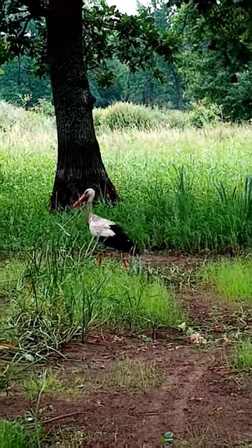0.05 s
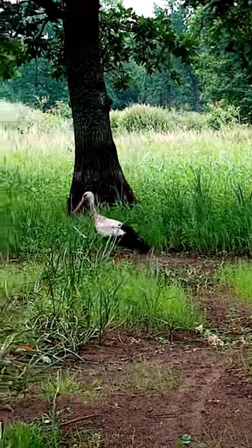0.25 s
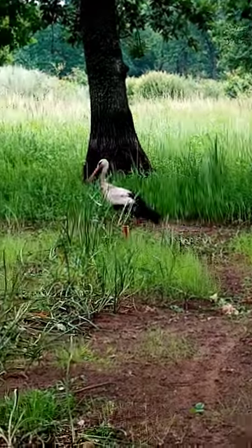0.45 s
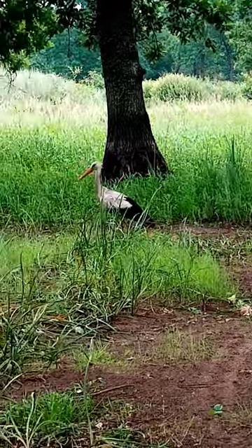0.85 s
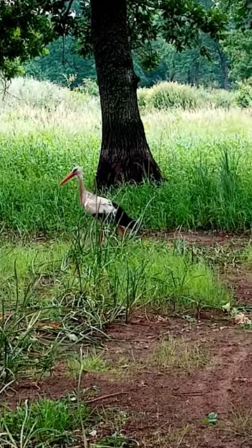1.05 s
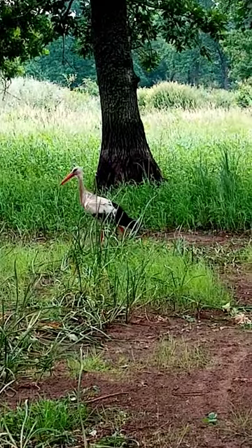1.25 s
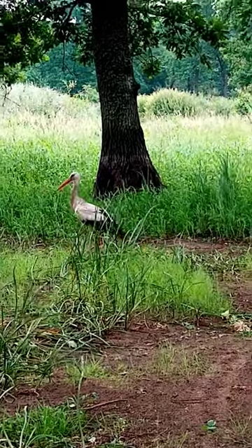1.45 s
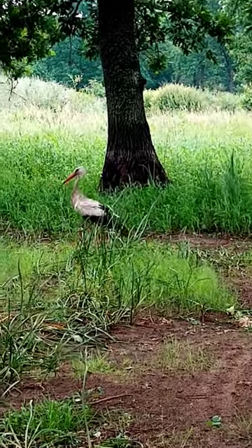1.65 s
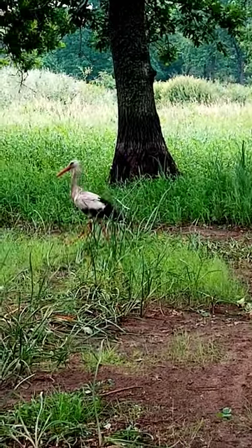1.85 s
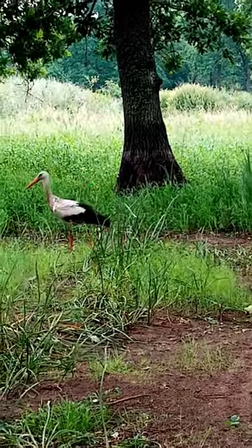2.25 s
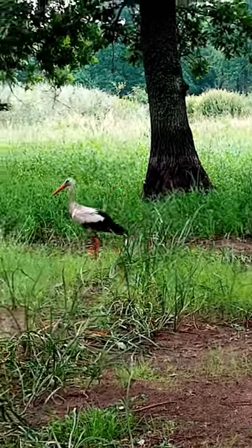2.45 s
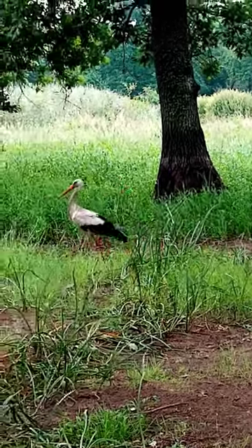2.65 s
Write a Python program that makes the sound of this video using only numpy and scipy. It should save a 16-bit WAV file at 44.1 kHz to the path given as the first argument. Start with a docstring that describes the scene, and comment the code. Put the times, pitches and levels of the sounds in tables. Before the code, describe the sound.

Wind buffets the microphone with low rumble and thumps, mostly on the left, at a meadow edge. A small bird gives a thin falling whistle, a twig snaps, something creaks briefly, and another whistle begins over faintly hissing leaves.

```python
"""Wind and a whistle at a meadow edge

Wind buffets the left microphone port with rumble, flutter and thumping eddies. A small bird whistles
one thin falling note, echoed by the trees, and starts another. Close by come a few dry ticks, a twig
snapping and a short, slowing stick-slip creak, over a faint hiss of leaves and far twittering."""
import sys
import numpy as np
from scipy import signal
from scipy.fft import rfft, irfft, next_fast_len
from scipy.io import wavfile
from scipy.ndimage import uniform_filter1d, map_coordinates

SR = 44100
rng = np.random.default_rng(int(sys.argv[2]) if len(sys.argv) > 2 else 0)


def inscribe(sig):
    """Save sig as 16-bit PCM at rate SR to the path in sys.argv[1].

    A 1-D sig is mono; a 2-D sig holds one channel per row.
    Samples are clipped to [-1, 1] before scaling.
    """
    pcm = np.round(np.clip(np.atleast_2d(sig).T, -1, 1) * 32767)
    wavfile.write(sys.argv[1], SR, pcm.astype(np.int16))


N = 123479
TIME = np.arange(N) / SR


def amp(db):
    """Decibels to gain."""
    return 10 ** (np.asarray(db) / 20)


def unit(x):
    """Scale to rms 1."""
    return x / np.sqrt(np.mean(x ** 2) + 1e-20)


def pan(db):
    """Stereo gains that put the left side db above the right."""
    return amp(np.array([[db], [-db]]) / 2)


def curves(rows, start=0):
    """Breakpoints to one curve for each column after the time."""
    times, *columns = np.transpose(rows)
    return [np.interp(TIME - start, times, column) for column in columns]


def during(rows, start=0):
    """A gate, open from the first breakpoint to the last."""
    return (TIME - start >= rows[0][0]) & (TIME - start <= rows[-1][0])


def wobble(rate):
    """A smooth random curve, rate knots a second."""
    return map_coordinates(rng.standard_normal(1024), [TIME * rate], mode="wrap")


def noise(colour):
    """Two unrelated noises of rms 1, shaped by (Hz, dB) points."""
    size = next_fast_len(N + 8192)
    hz, db = np.transpose(colour)
    gain = amp(np.interp(np.log(np.fft.rfftfreq(size, 1 / SR) + 1), np.log(hz + 1), db))
    white = rng.standard_normal((2, size))
    return unit(irfft(rfft(white) * gain, size)[:, :N])


def evened(x, window_s=0.035):
    """Noise with its chance swells flattened."""
    power = uniform_filter1d(x ** 2, int(window_s * SR), axis=-1)
    return x / np.sqrt(np.abs(power) + 0.022)


def kick(centre_s, hz, cycles):
    """One brief swing of pressure: a sine under a bell curve."""
    turns = np.clip((TIME - centre_s) * hz, -20, 20)
    return np.sin(2 * np.pi * turns) * np.exp(-(turns / cycles) ** 2 / 2)


def echo(x, t60, rise_s=.0023):
    """A diffuse tail of scattered echoes, different on each side."""
    t = np.arange(SR) / SR
    tail = rng.standard_normal((2, SR)) * amp(-60 * t / t60) * (1 - np.exp(-t / rise_s))
    return signal.fftconvolve(np.atleast_2d(x), tail / np.linalg.norm(tail[0]), axes=1)[:, :N]


def distant_air():
    """A faint, low bed of far-off air."""
    return amp(-68) * noise([(30, -8.5), (100, -4), (300, -27), (700, -15), (1200, -17.5), (3000, -62)])


# The colour of the leaf hiss. Each row: frequency in Hz, relative level in dB.
LEAF_COLOUR = [(500, -43.5), (900, -16.5), (1400, -3.5), (2000, -4), (2400, -2), (3100, -5.5), (4000, -1),
               (5200, -2), (6500, 2), (7450, 0), (8400, -15), (9200, -31), (12500, -29), (15200, -33.5)]
# Level of the background hiss, which ducks during the strongest gusts and then recovers. Each row: time in
# seconds, level in dB.
LEAF_LEVEL = [(0, -56), (.5, -54), (.82, -58), (1.1, -57), (1.45, -57.5), (1.8, -56.5), (2.25, -54),
              (2.5, -54.5), (2.8, -56)]


def leaves():
    """A wide hiss of leaves that ducks during the strongest gusts and then recovers."""
    mid, side = noise(LEAF_COLOUR)
    hiss = unit(np.array([mid + side, mid - side]))
    level_db, = curves(LEAF_LEVEL)
    return hiss * pan(2) * amp(level_db + 1.68 * wobble(25.37))


# A far songbird's phrase. Each row: time in seconds, pitch in Hz, level in dB.
TWITTER_PHRASE = [(0, 2600, -75), (.12, 2600, -69), (.29, 2950, -66), (.5, 2700, -70), (.6, 3650, -65),
                  (.68, 3700, -74)]


def far_twitter():
    """Quick wandering syllables from the wood, heard only as echo."""
    hz, db = curves(TWITTER_PHRASE)
    hz = hz * np.exp(.05 * wobble(70))
    syllables = wobble(35) ** 2
    song = unit(syllables * np.sin(2 * np.pi * np.cumsum(hz) / SR))
    return echo(during(TWITTER_PHRASE) * amp(db) * song, t60=.3)


# Small taps. Each row: time in seconds, level in dB, pitch in Hz, left over right in dB.
TICK_HITS = [(0.4213, -32, 1214, -22.5), (0.4236, -34, 3800, -8.5), (0.449, -38, 5000, -10),
             (0.4583, -33, 4900, -13), (0.4622, -30, 5400, -16.5)]


def ticks():
    """Tiny dry contacts near the right port."""
    return sum(amp(db) * pan(side) * kick(at, hz, cycles=.32) for at, db, hz, side in TICK_HITS)


# The twig breaking. Each row: start in seconds, level in dB, left over right in dB.
TWIG_SNAPS = [(1.5769, -35, 10), (1.5862, -43.5, 0)]
# Its woody ring. Each row: frequency in Hz, relative level in dB, seconds to fade by 60 dB.
TWIG_MODES = [(1653, -7.5, 0.029), (1724, -5.5, 0.05), (1840, -9.5, 0.043), (3770, -5.5, 0.02),
              (5750, -11, .018), (4660, 1, 0.0058), (6350, 10, 0.0075), (6900, -5.5, 0.02)]
# The colour of its crack. Each row: frequency in Hz, relative level in dB.
CRACK_COLOUR = [(500, -3), (1500, -6), (4000, 3.5), (6800, -3), (8000, -19.5), (10000, -26), (15000, -61)]


def twig(right_lag_s=0.00102, attack_s=0.000067, crack_t60=0.026):
    """Each snap is a crack with a short woody ring, reaching the left port first."""
    snaps = np.zeros((2, N))
    for start, db, side in TWIG_SNAPS:
        t = np.maximum(TIME - start - np.array([[0], [right_lag_s]]), 0)
        ring = sum(amp(level - 60 * t / t60) * np.sin(2 * np.pi * hz * t)
                   for hz, level, t60 in TWIG_MODES)
        crack = noise(CRACK_COLOUR) * amp(-60 * t / crack_t60)
        attack = 1 - np.exp(-t / attack_s)
        snaps += amp(db) * pan(side) * attack * (0.9 * ring + crack)
    snaps = signal.sosfilt(signal.butter(6, 8000, fs=SR, output="sos"), snaps)
    return snaps + amp(-8) * echo(snaps, t60=0.26)


# The creak's gesture. Each row: time in seconds, slips a second, slip strength in dB.
CREAK_GESTURE = [(2.255, 197, -64), (2.285, 202, -40.5), (2.31, 180, -43.5), (2.328, 140, -36),
                 (2.355, 101, -44.5), (2.38, 110, -57), (2.41, 80, -45), (2.46, 64, -57), (2.51, 43, -45),
                 (2.525, 15.3, -72)]
# Its resonances. Each row: frequency in Hz, relative level in dB, swell in seconds,
# exponent on slip strength.
CREAK_RESONANCES = [(1360, -1, 0.0015, 1.1), (2790, -14.5, 0.0013, 2.5)]
# The rub that leads into the creak. Each row: time in seconds, level in dB.
SCUFF_SWELL = [(2.148, -82.5), (2.165, -48), (2.19, -57), (2.205, -70.5), (2.26, -58.5), (2.33, -77)]
# The colour of that rub. Each row: frequency in Hz, relative level in dB.
SCUFF_TONE = [(700, -45), (1050, -11), (1380, -1.5), (1700, -3), (2100, -15), (2600, -7), (3300, -14.5),
              (6000, -47)]


def creak():
    """A scuff turns into slowing stick-slip pulses that ring two resonances, hard slips brighter."""
    rate, db = curves(CREAK_GESTURE)
    slip_count = np.floor(np.cumsum(rate * (1 + 0.05 * wobble(90))) / SR)
    strength = during(CREAK_GESTURE) * amp(db - db.max() + wobble(88))
    slips = np.diff(slip_count, prepend=0) * strength
    t = np.arange(SR // 20) / SR
    body = np.zeros(N)
    for hz, level, swell_s, exponent in CREAK_RESONANCES:
        envelope = (t / swell_s * np.exp(1 - t / swell_s)) ** 3
        ring = amp(level) * envelope * np.sin(2 * np.pi * hz * t)
        body += signal.fftconvolve(slips ** exponent, ring)[:N]
    scuff_db, = curves(SCUFF_SWELL)
    scuff = during(SCUFF_SWELL) * amp(scuff_db) * noise(SCUFF_TONE)[0]
    direct = amp(db.max()) * body + scuff
    return direct * pan(9) + amp(-4) * echo(direct, t60=0.1)


def whistle(rows, start=0):
    """A pure, slightly wavering tone along a pitch and level curve."""
    hz, db = curves(rows, start)
    envelope = during(rows, start) * amp(db + wobble(120))
    wavering_hz = hz * (1 + .008 * wobble(150))
    return envelope * np.sin(2 * np.pi * np.cumsum(wavering_hz) / SR)


# The falling note. Each row: seconds into the note, pitch in Hz, relative level in dB.
FALLING_NOTE = [(0, 7950, -16), (.008, 7650, -3), (.025, 7170, -1), (.04, 6880, -1), (.06, 6570, 1),
                (.085, 6300, 3), (.115, 6050, 3), (.145, 5640, 2.5), (.175, 5100, -1), (.205, 4700, -4.5),
                (.226, 4480, -12), (.236, 4400, -30)]
# The bird's cues for that note. Each row: start in seconds, level in dB.
NOTE_CUES = [(0.964, -48), (2.747, -50)]
# A second bird's chip. Each row: time in seconds, pitch in Hz, level in dB.
CHIP_NOTE = [(2.756, 3700, -59), (2.766, 4280, -58), (2.776, 4620, -52), (2.782, 4670, -69),
             (2.799, 4250, -60)]


def birds(upper_spacing_hz=3900):
    """Falling whistles and a small chip, smeared by near and far echoes, with faint tones above."""
    song = sum(amp(db) * whistle(FALLING_NOTE, start) for start, db in NOTE_CUES) + whistle(CHIP_NOTE)
    ground_and_trunk = amp(3.5) * echo(song, t60=.15, rise_s=.015)
    wood = amp(4) * echo(song, t60=.6, rise_s=.015)
    heard = song * pan(9) + pan(2.5) * (ground_and_trunk + wood)
    # Two frequency-shifted copies ride above the song, evenly spaced.
    shifts = sum(np.exp(2j * np.pi * k * upper_spacing_hz * TIME) / k ** 2 for k in (1, 2))
    upper_tones = (signal.hilbert(heard) * shifts).real
    return heard + amp(-36) * upper_tones


# Gusts at the exposed left port. Each row: time in seconds, level in dB.
EXPOSED_GUSTS = [(0, -34.5), (.1, -38), (.14, -24.5), (.2, -44.5), (.23, -25), (.37, -26.5), (.395, -42),
                 (.44, -23), (.52, -26), (.63, -35.5), (.67, -22.5), (.73, -27.5), (.8, -14.5), (.83, -17),
                 (.87, -26.5), (.915, -16.5), (.94, -26.5), (1.04, -18.5), (1.09, -28.5), (1.14, -19.5),
                 (1.22, -34.5), (1.28, -23.5), (1.33, -33), (1.45, -21), (1.53, -32.5), (1.64, -24.5),
                 (1.69, -32), (1.75, -21.5), (1.84, -28), (1.93, -32), (2.04, -26.5), (2.09, -37),
                 (2.21, -21.5), (2.26, -32), (2.36, -22.5), (2.42, -25), (2.45, -36.5), (2.48, -23.5),
                 (2.55, -25.5), (2.6, -43.5), (2.64, -70), (2.67, -33), (2.73, -35), (2.8, -50)]
# Gusts at the sheltered right port. Each row: time in seconds, level in dB.
SHELTERED_GUSTS = [(0, -46.5), (.12, -45), (.18, -26.5), (.33, -63.5), (.43, -42.5), (.58, -87), (.73, -42),
                   (.85, -46.5), (1.48, -45.5), (1.7, -78), (2.28, -80), (2.44, -59.5), (2.62, -80)]
# The colour of the deep rumble. Each row: frequency in Hz, relative level in dB.
RUMBLE_COLOUR = [(20, -34), (35, -19), (55, -5), (90, 0), (140, 0), (200, -10), (300, -32), (420, -52),
                 (2000, -120)]
# The colour of the brighter flutter. Each row: frequency in Hz, relative level in dB.
FLUTTER_COLOUR = [(120, -15), (200, 7), (320, 3), (480, -16.5), (650, -29), (900, -36.5), (2000, -100)]


def wind(strong_gust_db=-23, flutter_growth=2.3):
    """Rumble follows the gusts at each port; flutter grows faster and saturates in strong gusts."""
    gust_db = np.array(curves(EXPOSED_GUSTS) + curves(SHELTERED_GUSTS))
    rumble = evened(noise(RUMBLE_COLOUR)) * amp(gust_db + wobble(32.88))
    flutter_db = -32 + flutter_growth * np.minimum(gust_db - strong_gust_db, 0)
    flutter = evened(noise(FLUTTER_COLOUR)) * amp(flutter_db + 3.5 * wobble(70))
    return rumble + flutter


# Eddy hits. Each row: time in seconds, thump level in dB, thump pitch in Hz, front level in dB.
EDDY_HITS = [(.239, -7, 240, -24.5), (0.409, -14.5, 143, -40.5), (.475, -12, 173, -51),
             (0.676, -13.5, 207, -19.5), (0.697, -19.5, 232, -34.5), (0.761, -9, 196, -24),
             (.776, -12.5, 271, -24.5), (.784, -23, 202, -16), (0.799, -9.5, 200, -21),
             (0.823, -11, 197, -17), (0.846, -11.5, 253, -21.5), (0.9042, -6.5, 351, -19),
             (0.996, -34.5, 199, -19.5), (1.029, -15.5, 239, -29), (1.043, -18.5, 294, -20),
             (1.071, -16, 197, -23.5), (1.139, -20, 155, -18.5), (1.172, -14.5, 194, -28.5),
             (1.251, -9.5, 178, -21), (1.338, -13, 134, -43), (1.387, -18.5, 182, -26.5),
             (1.48, -12, 150.5, -34), (1.573, -19, 275, -45), (1.635, -10.5, 131, -57),
             (1.663, -15, 209, -35.5), (1.737, -23, 280, -25), (1.746, -12, 186, -28),
             (1.788, -18, 131, -54), (1.821, -15, 195, -33), (1.861, -21.5, 210, -44),
             (1.899, -19, 123.5, -42), (2.029, -17.5, 226.5, -27), (2.054, -19.5, 212, -35),
             (2.109, -17.5, 142, -33), (2.217, -10.5, 192, -29), (2.33, -17, 208, -30.5),
             (2.364, -11, 135, -45), (2.42, -20.5, 190, -30), (2.471, -16, 228, -33)]


def eddies():
    """Single eddies strike the exposed port, each a low thump with a steep, higher-pitched front."""
    thumps = np.zeros(N)
    for at, db, hz, front_db in EDDY_HITS:
        front_hz = 414 * (hz / 220) ** 0.78
        thumps += amp(db) * kick(at, hz, cycles=.5) + amp(front_db) * kick(at, front_hz, cycles=.6)
    return thumps * amp([[0], [-36]])


def scene():
    """The stereo mix at the two ports."""
    return (wind() + eddies() + leaves() + distant_air()
            + birds() + far_twitter() + ticks() + twig() + creak())


def record(dry, low_cut_hz=45, top_hz=15500):
    """The recorder cuts the deepest rumble, dulls the top octave and keeps nothing above top_hz."""
    size = next_fast_len(N + 8192)
    hz = np.fft.rfftfreq(size, 1 / SR)
    low_cut = hz ** 2 / np.hypot(hz ** 2, low_cut_hz ** 2)
    high_shelf = amp(np.interp(hz, [7800, 10000], [0, -3]))
    return irfft(rfft(dry, size) * low_cut * high_shelf * (hz < top_hz), size)[:, :N]


dry = scene()
out = record(dry)
inscribe(out)
```